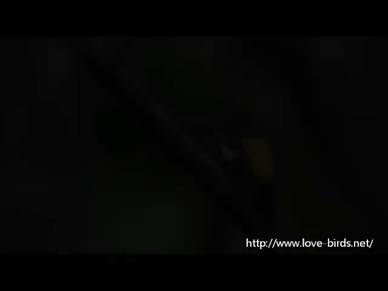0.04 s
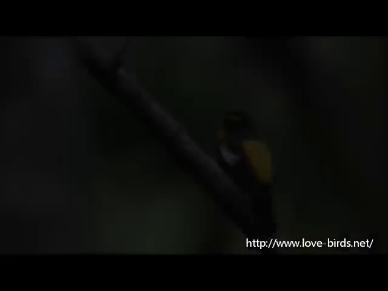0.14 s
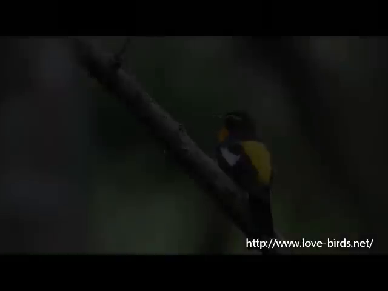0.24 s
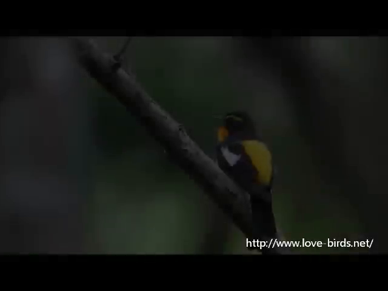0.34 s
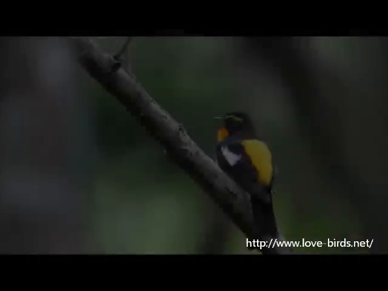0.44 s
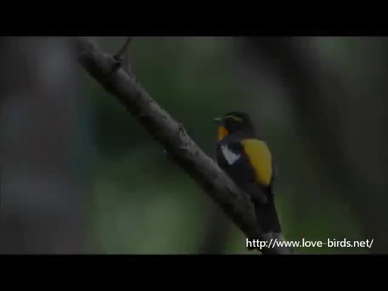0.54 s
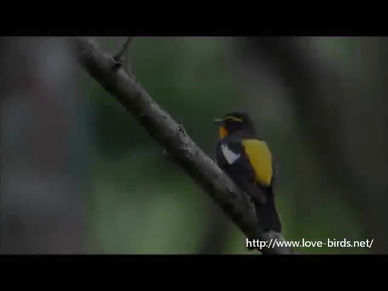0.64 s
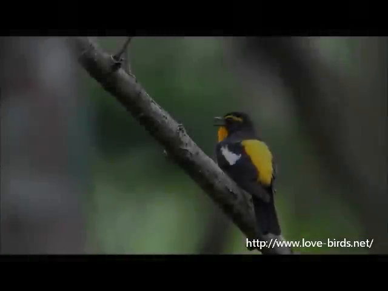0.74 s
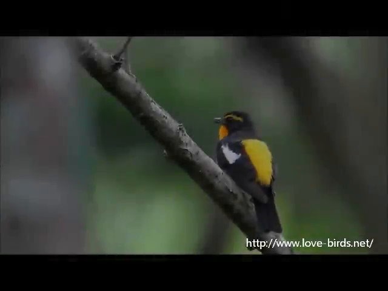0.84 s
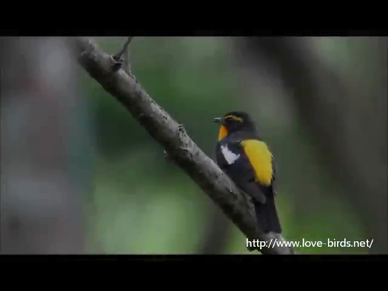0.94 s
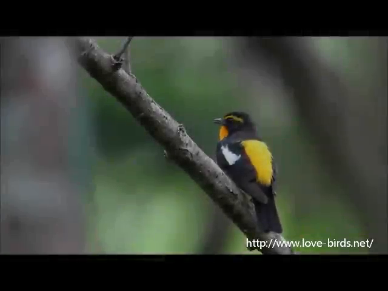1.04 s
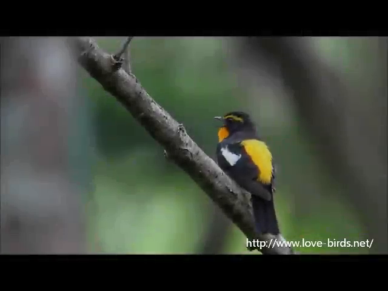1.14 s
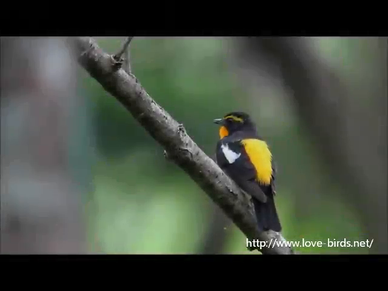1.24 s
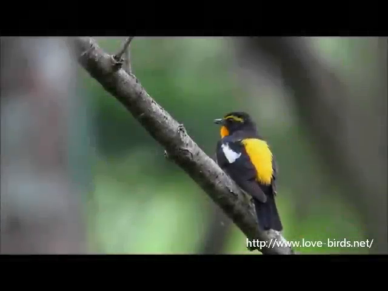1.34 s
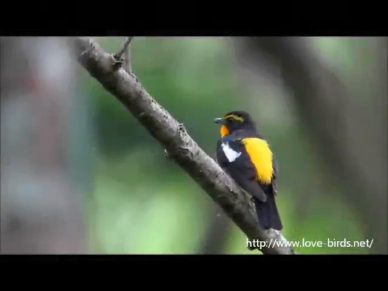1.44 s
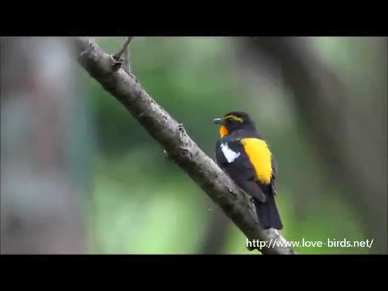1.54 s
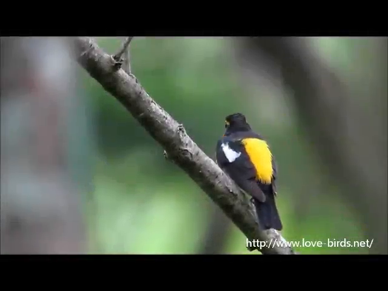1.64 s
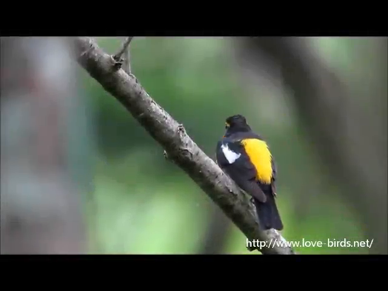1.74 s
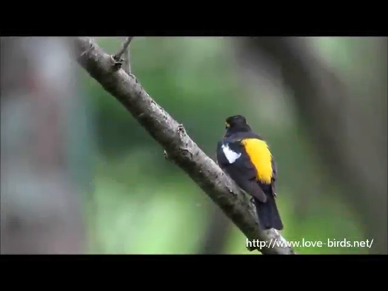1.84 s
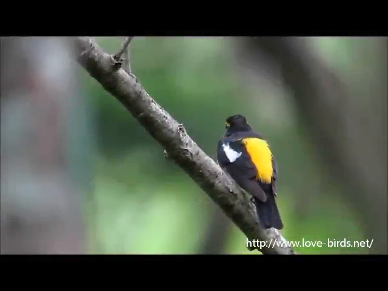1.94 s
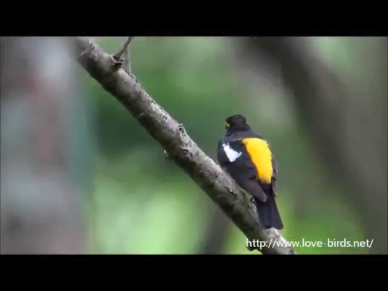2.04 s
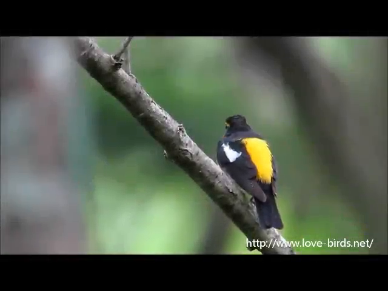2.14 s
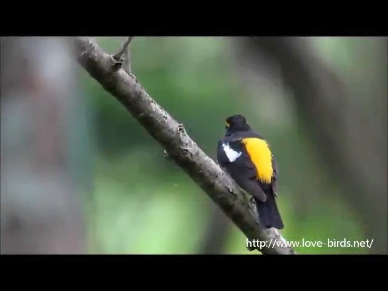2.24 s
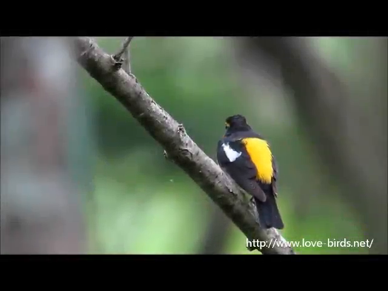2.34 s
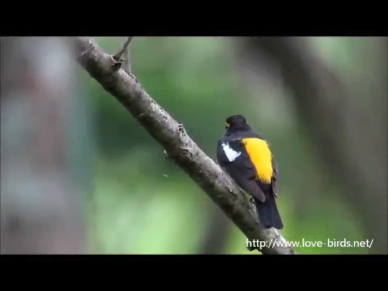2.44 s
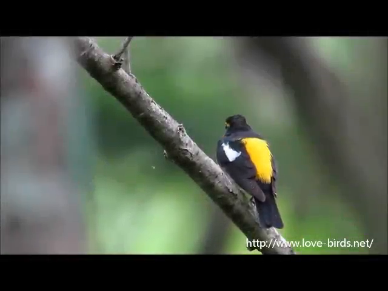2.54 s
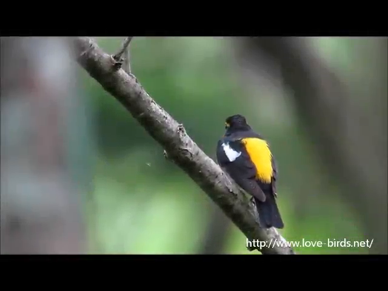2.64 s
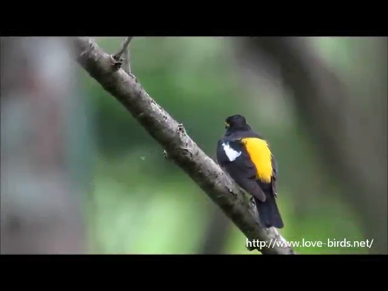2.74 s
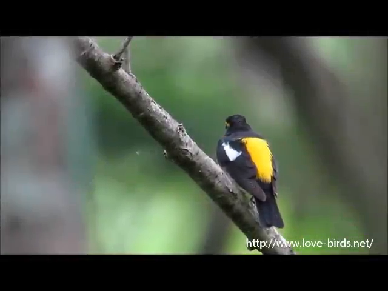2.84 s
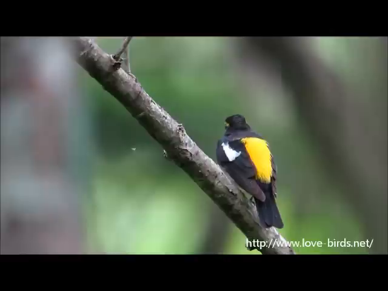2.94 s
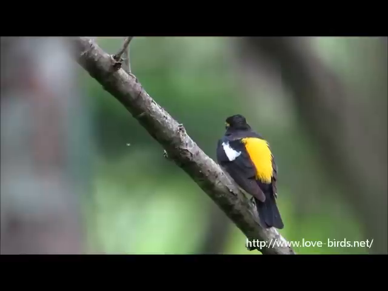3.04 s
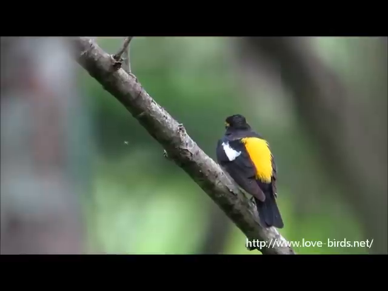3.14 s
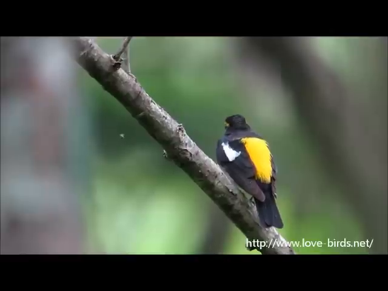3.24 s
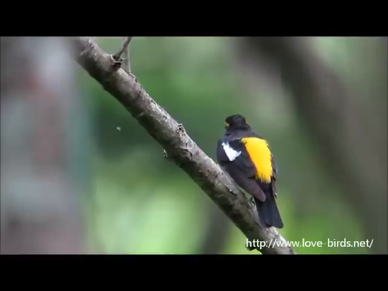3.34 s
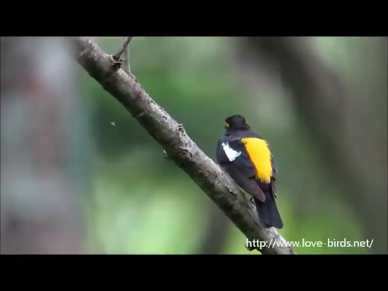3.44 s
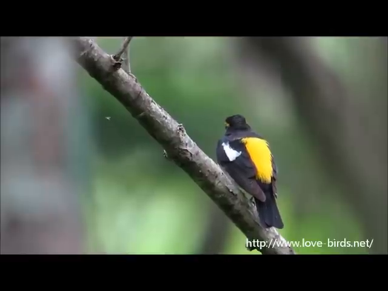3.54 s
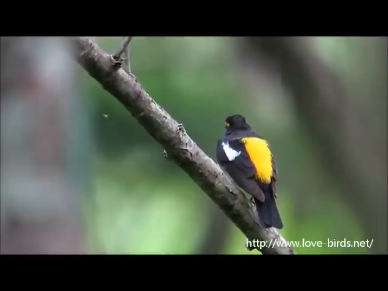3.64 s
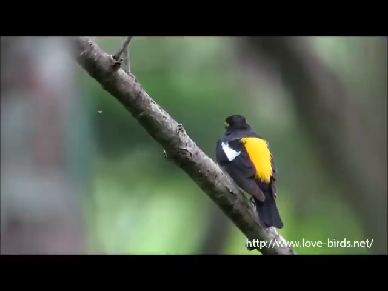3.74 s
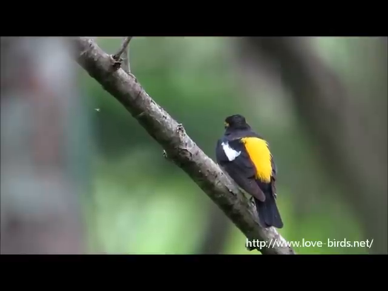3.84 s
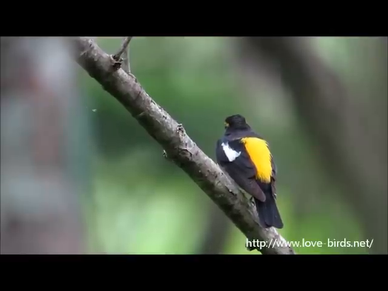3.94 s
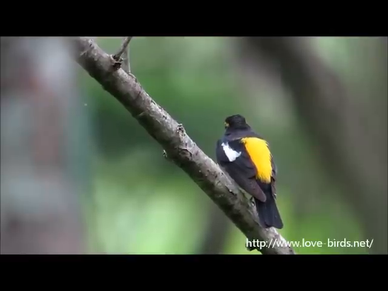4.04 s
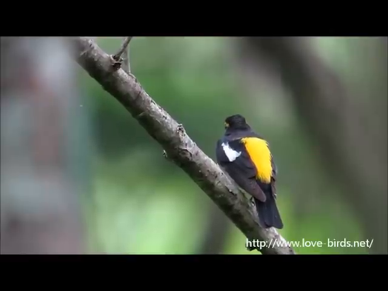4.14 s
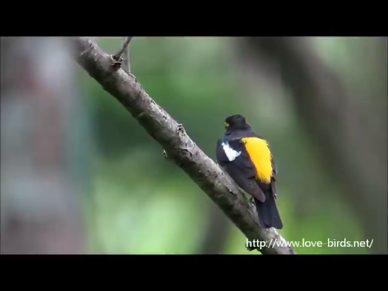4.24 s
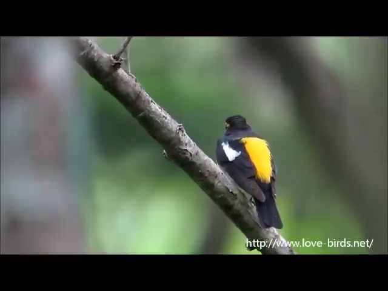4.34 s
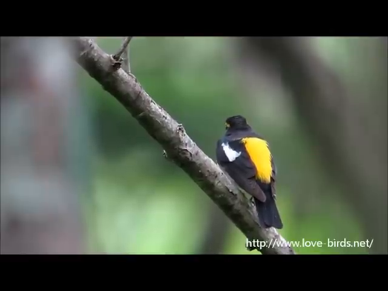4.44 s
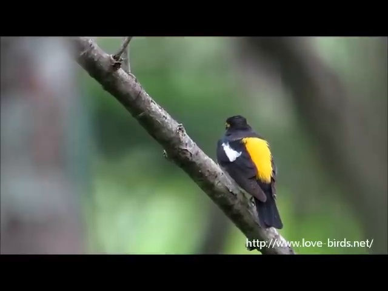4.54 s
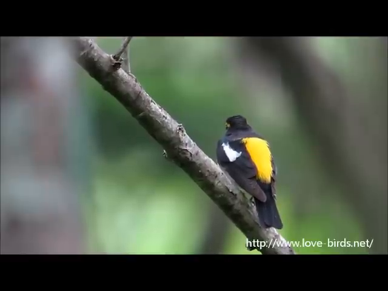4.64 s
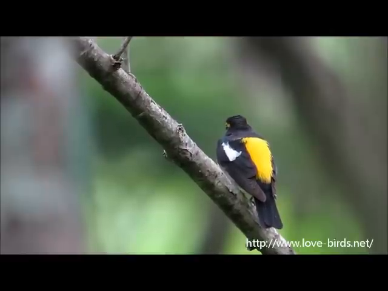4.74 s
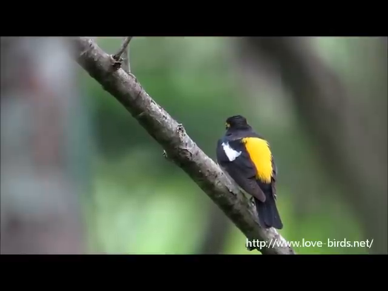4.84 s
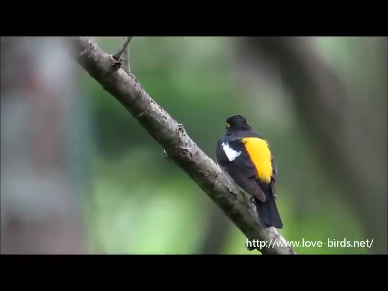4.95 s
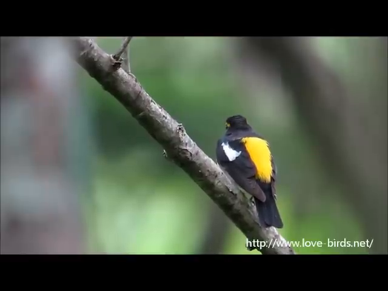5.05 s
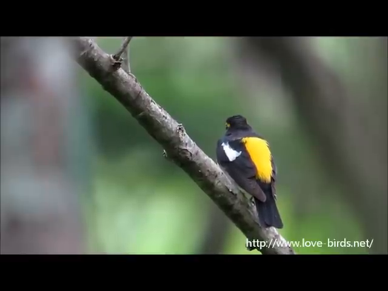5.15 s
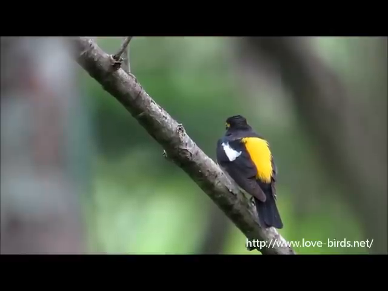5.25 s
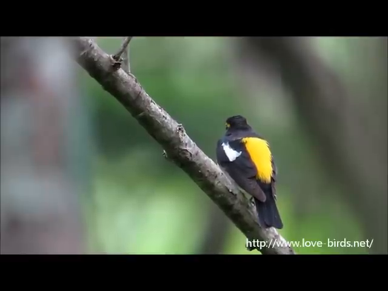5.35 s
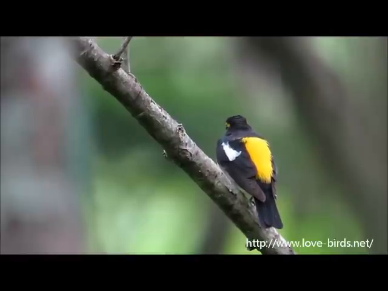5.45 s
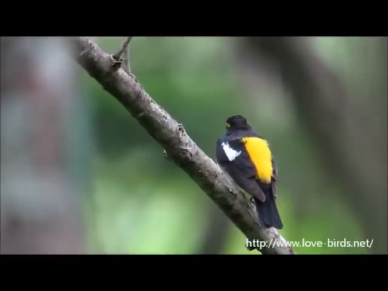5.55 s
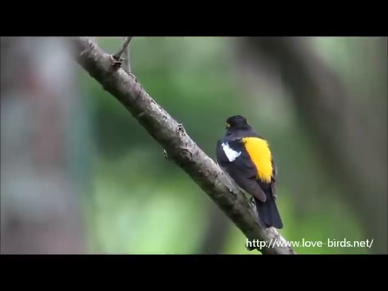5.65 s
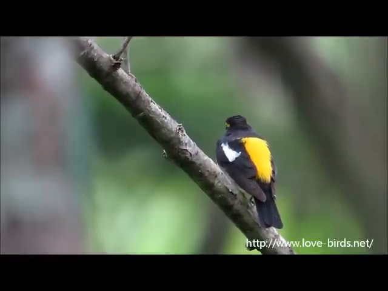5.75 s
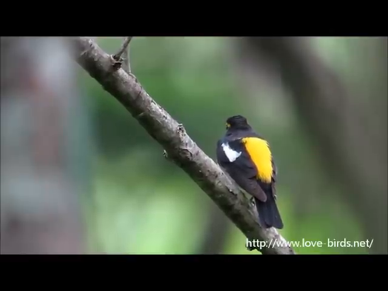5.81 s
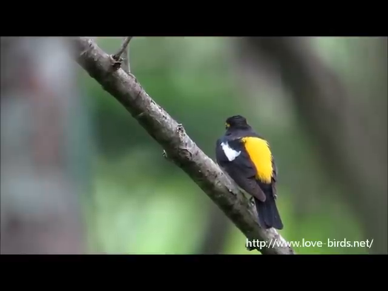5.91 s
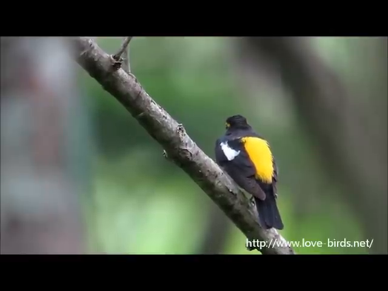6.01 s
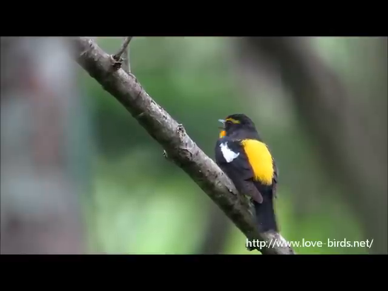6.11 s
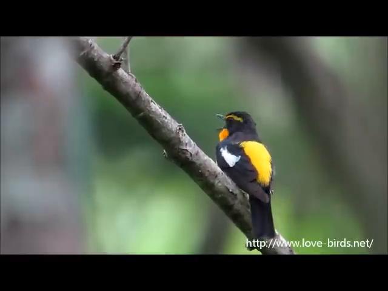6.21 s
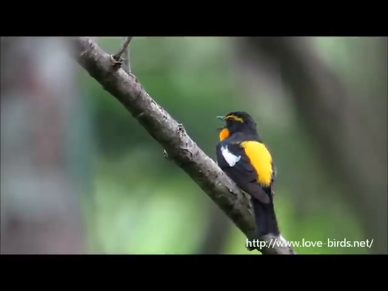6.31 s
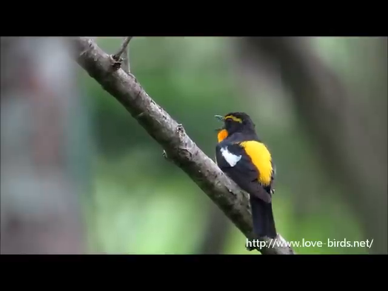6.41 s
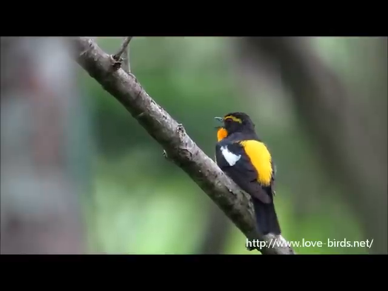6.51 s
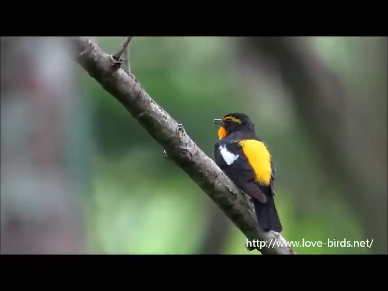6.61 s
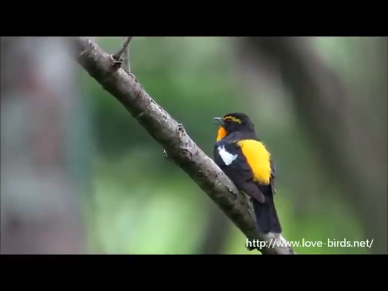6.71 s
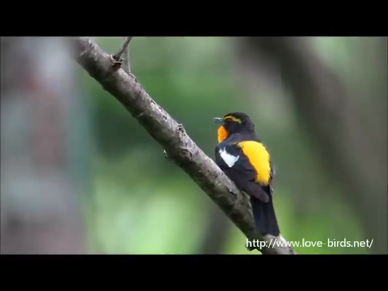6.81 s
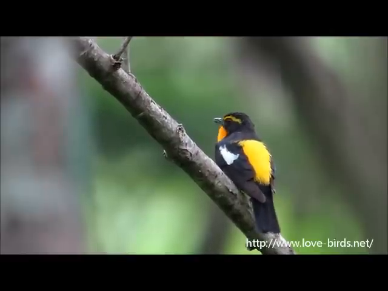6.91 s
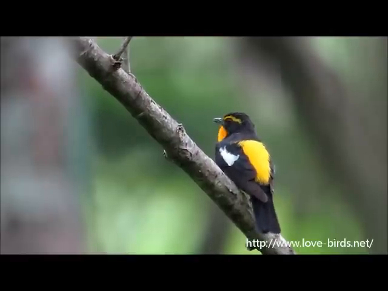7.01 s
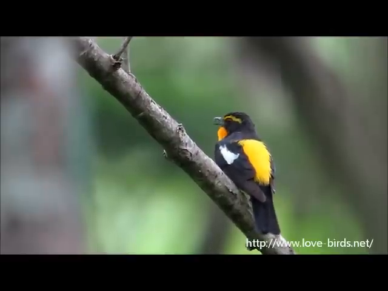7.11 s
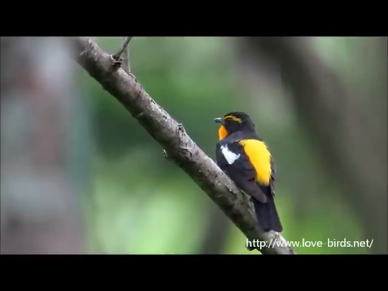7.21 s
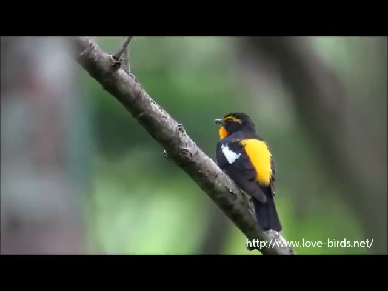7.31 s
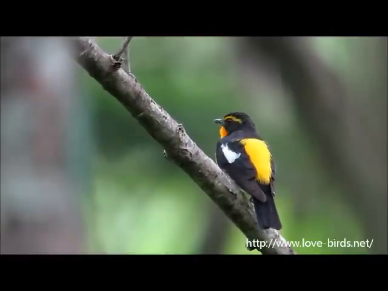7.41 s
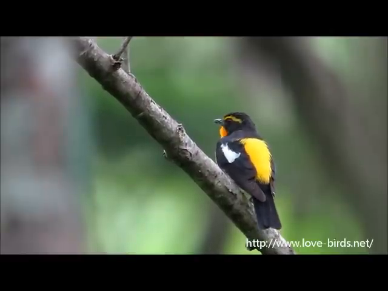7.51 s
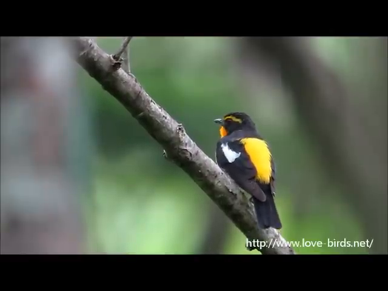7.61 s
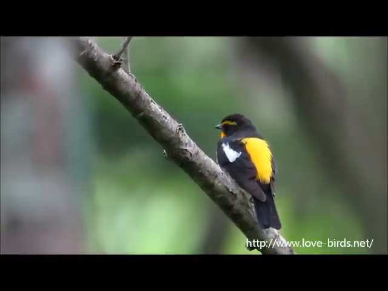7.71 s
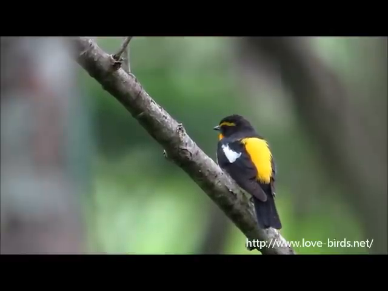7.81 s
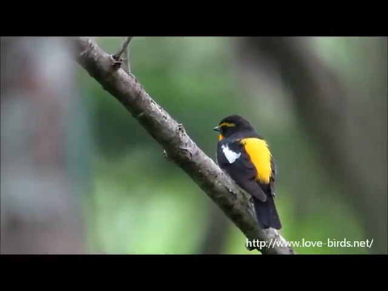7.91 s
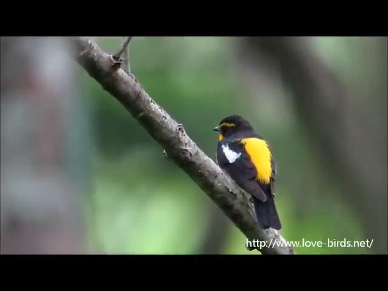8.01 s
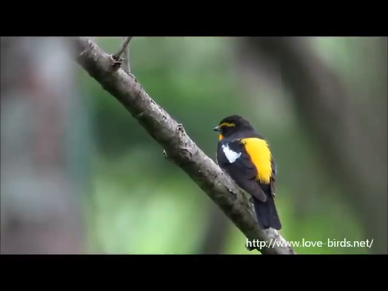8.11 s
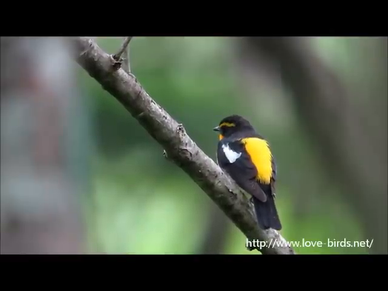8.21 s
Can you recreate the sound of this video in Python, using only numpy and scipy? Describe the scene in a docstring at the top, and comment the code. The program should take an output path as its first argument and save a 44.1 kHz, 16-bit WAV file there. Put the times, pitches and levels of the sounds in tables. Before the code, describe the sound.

Quiet forest air fades in as a nearby songbird, a little to the left, sings a fast warbled buzz and three arched whistles: high, low, high. Birds further off fill the pause with softer slurs, trills and thin calls. The near bird then repeats its phrase, louder. Every note echoes among the trees, over a faint distant rumble and hiss with a few tiny ticks and knocks.

```python
"""A flycatcher in the woods

A flycatcher on a branch sings two phrases: a fast warbled buzz, then three arched whistles, high,
low, high. Birds further off fill the pause with softer slurs and trills, and the trunks scatter
every note into a long tail. Under them lie a distant rumble, hiss, a low drone, a narrow band of
high hiss and a few small ticks and knocks. The sound fades in."""
import sys
import numpy as np
from scipy import signal
from scipy.fft import rfft, irfft
from scipy.io import wavfile
from scipy.ndimage import uniform_filter1d, map_coordinates

SR = 44100
rng = np.random.default_rng(int(sys.argv[2]) if len(sys.argv) > 2 else 0)


def output_pcm(signal):
    """Save a mono or channel-first signal as 16-bit PCM at the path in sys.argv[1].

    Samples are clipped to [-1, 1] before scaling.
    """
    pcm = np.clip(np.atleast_2d(signal).T, -1, 1) * 32767
    wavfile.write(sys.argv[1], SR, np.round(pcm).astype(np.int16))


N = 364707
TIME = np.arange(N) / SR
BINS = np.fft.rfftfreq(N, 1 / SR)


def gain_of(db):
    """Turns decibels into a number to multiply by."""
    return 10 ** (np.asarray(db) / 20)


def evened(x):
    """Scales a signal so its average power is 1."""
    return x / np.sqrt(np.mean(abs(x) ** 2) + 1e-20)


def read(points, hz):
    """Reads between the rows of a table, with frequencies spaced by octaves."""
    f, value = np.transpose(points)
    return np.interp(np.log(hz + 1), np.log(f + 1), value)


def coloured(x, db):
    """Turns each frequency up or down by its own number of dB."""
    return irfft(rfft(x) * gain_of(db), N)


def drift(size, rate):
    """A smooth random wobble that moves about `rate` times a second."""
    knots = rng.standard_normal(int(size * rate / SR) + 4)
    return map_coordinates(knots, [1 + np.arange(size) * rate / SR], order=3, mode="nearest")


def add(mix, s, sound):
    """Mixes a sound in, starting at s seconds."""
    part = mix[round(s * SR):][:len(sound)]
    part += sound[:len(part)]


# The steady air of the wood. Each row: frequency in Hz, relative level in dB.
AIR_COLOUR = [(20, -2), (60, 2), (150, -1.5), (240, -2.5), (400, -5), (700, -8.5), (1200, -12.5),
              (2500, -12), (4500, -11), (6500, -25.5), (9500, -27), (12500, -26.5), (15700, -32.5)]
# How alike left and right sound. Each row: frequency in Hz, likeness from 0 to 1.
AIR_LIKENESS = [(30, 0.37), (250, 0.3), (600, 0.36), (1200, 0.026), (16000, 0.071)]
def air(level_db=-49.5, patchy_db=1.5, swell_db=0.59):
    """Distant rumble and hiss, drifting in patches."""
    frames, hz = N // 256 + 5, np.fft.rfftfreq(1024, 1 / SR)
    a, b, c, d, patches = rng.standard_normal((5, frames, 513))
    patches = uniform_filter1d(patches, size=24, axis=0)  # smooth over time
    patches = evened(uniform_filter1d(patches, size=5, axis=1))  # and over frequency
    likeness = read(AIR_LIKENESS, hz)
    left = a + 1j * b
    right = likeness * left + np.sqrt(1 - likeness ** 2) * (c + 1j * d)
    colour_db = read(AIR_COLOUR, hz) + patchy_db * patches / (1 + hz / 5000)  # high hiss is smoothest
    spectra = np.array([left, right]) * gain_of(colour_db)
    _, wash = signal.istft(spectra.swapaxes(1, 2), nperseg=1024, noverlap=768)
    return evened(wash[:, :N]) * gain_of(level_db + swell_db * drift(N, 5))


# The path of the far drone. Each row: time in seconds, pitch in Hz, level in dB.
DRONE = [(.5, 299.6, -67), (2.599, 289.3, -59.5), (3.801, 272.2, -59.5), (5, 238.3, -62.5), (6, 217.3, -59),
         (7.2, 213, -56.5), (8.27, 210.7, -54.5)]
def drone_and_high_hiss(drone_width_hz=30, hiss_hz=8830, hiss_db=-69, hiss_width_hz=90):
    """A far drone that slowly sinks, and a narrow band of high hiss just above the treble notch."""
    def noise_band(hz, db, width_hz):
        tone = np.exp(2j * np.pi * np.cumsum(hz * np.ones(N)) / SR)
        wobble = drift(N, width_hz) + 1j * drift(N, width_hz)
        return gain_of(db) * evened((wobble * tone).real)
    s, hz, db = np.transpose(DRONE)
    drone = np.interp(TIME, s, hz), np.interp(TIME, s, db), drone_width_hz
    return np.array([noise_band(*drone) + noise_band(hiss_hz, hiss_db, hiss_width_hz) for _ in range(2)])


def bird_voice(hz, db, depth_hz=0, warble_hz=94.2, jitter=0.0037, flutter_db=3.0, dwell=1.3):
    """A nearly pure tone; in a warble the pitch rests low and flicks upward, a little unevenly."""
    size = len(hz)
    cycle = np.pi * np.cumsum(warble_hz * (1 + 0.115 * drift(size, 79.5))) / SR
    swing = 2 * (np.sin(cycle) ** 2) ** dwell - 1
    pitch = hz * (1 + jitter * drift(size, 249.8)) + depth_hz * swing
    phase = 2 * np.pi * np.cumsum(pitch) / SR
    tone = np.sin(phase) + gain_of(-48) * np.sin(2 * phase) + gain_of(-46) * np.sin(3 * phase)
    edges = signal.windows.tukey(size, min(1, 0.0022 * SR / size))
    return np.sqrt(2) * tone * edges * gain_of(db + flutter_db * drift(size, 120.0))


def forest(x, early_t60, late_t60, late_db, near_db):
    """Echoes: branches answer at once, near trunks soon after, and the deep wood lingers."""
    size = 2 * SR
    t = np.arange(size) / SR
    echoes = rng.standard_normal((2, size)) * (rng.random((2, size)) < (1500 + 6000 * t) / SR)
    # A t60 is the number of seconds a sound takes to fade by 60 dB.
    tail = echoes * np.hypot(gain_of(-60 * t / early_t60), gain_of(late_db - 60 * t / late_t60))
    tail /= np.linalg.norm(tail, axis=1, keepdims=True)
    for channel in tail:
        trunk_delays = rng.uniform(0.001988, .03, size=4)
        channel[(trunk_delays * SR).astype(int)] += gain_of(near_db) * rng.choice([-1, 1], size=4)
    return signal.fftconvolve(x[None], tail, axes=1)[:, :N]


# The flycatcher's buzzes. Each row: start and length in seconds, centre pitch in Hz,
# level in dB, warble depth in Hz.
BUZZES = [(0.259, 0.035, 3820, -34, 704), (0.355, 0.31, 4043, -27.5, 853), (6.304, .182, 4174, -22.5, 477),
          (6.555, .11, 4220, -23, 427)]
def buzzes(song, sag_hz_per_s=750, fade_db_per_s=36, catch_s=0.0079, accent_db=2):
    """Each starts firmly at the top of its swing, then warbles fast as it sinks and weakens."""
    for s, length, centre_hz, db, depth_hz in BUZZES:
        t = np.arange(0, length, 1 / SR)
        held = np.exp(-t / catch_s)
        hz = centre_hz - sag_hz_per_s * t + depth_hz * held
        level = db + accent_db * held - fade_db_per_s * t
        add(song, s, bird_voice(hz, level, depth_hz * (1 - held)))


# The note before each long buzz. Each row: start and length in seconds, first and last pitch in Hz,
# level in dB.
LEAD_INS = [(0.288, 0.058, 3688, 3675, -24), (6.261, .05, 3485, 3970, -24.5), (6.52, .034, 4587, 4450, -16)]
def lead_ins(song, curve=1.41, swell_db=16):
    """Short clear notes that bend in pitch and are loudest in the middle."""
    for s, length, first_hz, last_hz, db in LEAD_INS:
        u = np.linspace(0, 1, int(length * SR))
        hz = first_hz + (last_hz - first_hz) * u ** curve
        add(song, s, bird_voice(hz, db - swell_db * (1 - np.sin(np.pi * u)), depth_hz=60))


def far_note(length, first_hz, last_hz, db, depth_hz, settle=3.2, onset_db=-10, release_db=-4):
    """A far bird's note swells as it slides towards its last pitch, then eases off."""
    u = np.linspace(0, 1, int(length * SR))
    slide = (1 - np.exp(-settle * u)) / (1 - np.exp(-settle))
    hz = first_hz + (last_hz - first_hz) * slide
    level = db + onset_db * (1 - slide) + release_db * u ** 2
    return bird_voice(hz, level, depth_hz, warble_hz=170, jitter=0.0077)


# Far birds' falling notes. Each row: start and length in seconds, first and last pitch in Hz,
# level in dB, warble depth in Hz.
SLURS = [(0.771, 0.096, 5680, 4310, -49.5, 150), (1.822, 0.12, 3680, 2850, -56.5, 150),
         (2.01, 0.095, 5050, 4520, -54, 150), (2.29, .12, 5600, 4250, -47.5, 150),
         (2.894, 0.045, 4890, 3800, -43, 300), (3.892, 0.16, 4826, 4084, -36, 70),
         (4.455, 0.182, 6160, 4615, -39.5, 30), (5.75, 0.077, 4940, 4290, -56.5, 100),
         (6.169, 0.11, 5000, 4450, -43.5, 200)]
def far_slurs(song, settle_s=.032):
    """Each drops steeply, then levels out."""
    for s, length, *note in SLURS:
        add(song, s, far_note(length, *note, settle=length / settle_s, onset_db=-7.5))


# The flycatcher's whistles. Each row: start and length in seconds, top pitch in Hz, level in dB,
# rise time in seconds.
WHISTLES = [(0.866, .11, 3287, -26.5, .011), (1.074, .097, 2472, -35.5, 0.014),
            (1.242, 0.1, 3424, -24.5, 0.011), (6.871, .11, 3332, -26, 0.012),
            (7.073, .1, 2403, -35.5, .016), (7.237, .102, 3338, -27, .012)]
def arched_whistles(song, first_share=.54, last_share=.64, fall_s=.037, db_per_octave=28):
    """The pitch leaps up from a share of its top, holds and drops away; the level follows it."""
    for s, length, top_hz, db, rise_s in WHISTLES:
        t = np.arange(0, length, 1 / SR)
        rise = 1 - (1 - first_share) * np.exp(-t / rise_s)
        closing = np.clip(1 - (length - t) / fall_s, 0, 1)
        arch = rise * (1 - (1 - last_share) * closing ** 2)
        soft_start_db = -6 * np.exp(-t / 0.012)
        add(song, s, bird_voice(top_hz * arch, db + db_per_octave * np.log2(arch) + soft_start_db))


# How the throat and open bill shape the song. Each row: frequency in Hz, boost or cut in dB.
THROAT = [(1600, -2), (2400, -1.5), (3750, -0.5), (4150, 0.5), (4650, -7.5), (4950, -3.5), (5400, -8),
          (7000, -12), (11000, 0.5)]
# How much louder the song is on the left. Each row: frequency in Hz, left minus right in dB.
LEFT_LEAD = [(1500, 0.5), (2400, 0), (3300, 3.5), (3900, 8.5), (5000, 5), (9000, 1)]
def flycatcher(direct_db=-6, wood_db=-0.5):
    """Buzzes and arched whistles from a branch a little to the left, with their echoes."""
    song = np.zeros(N)
    for sing in lead_ins, buzzes, arched_whistles:
        sing(song)
    echo = forest(song, early_t60=0.61, late_t60=1.44, late_db=-16, near_db=-10)
    heard = gain_of(direct_db) * song + gain_of(wood_db) * echo
    sides_db = np.outer([.5, -.5], read(LEFT_LEAD, BINS))
    return coloured(heard, read(THROAT, BINS) + sides_db)


# The clearest dry ticks close by. Each row: start in seconds, level in dB.
TICKS = [(.8843, -45), (1.2639, -45.5), (1.6431, -47), (2.0556, -46), (2.4353, -46), (2.762, -44.5),
         (4.5335, -46)]
# Their brightness. Each row: frequency in Hz, boost or cut in dB.
TICK_COLOUR = [(300, -14), (2000, 3), (5000, 9), (7000, -1.5), (10000, 5), (13000, -2), (16000, -6)]
def ticks(t60=0.023, right_db=3.0, soft_between_s=(0.23, 3.3), soft_db=-54.5):
    """Very short bright snaps, a little to the right; seven softer ones fall at random."""
    t, strength = np.arange(2000) / SR, np.zeros(N)
    soft = [(s, soft_db) for s in rng.uniform(*soft_between_s, size=7)]
    for s, db in [*TICKS, *soft]:
        add(strength, s, gain_of(db - 60 * t / t60))
    snaps = coloured(strength * rng.standard_normal((2, N)), read(TICK_COLOUR, BINS))
    return snaps * gain_of([[-right_db], [right_db]])


# A far bird's four churrs. Each number: start in seconds.
CHURR_STARTS = [2.0, 2.755, 3.268, 3.85]
def far_churrs(song):
    """A low, falling note, roughened by a fast warble."""
    for s in CHURR_STARTS:
        add(song, s, far_note(length=.15, first_hz=2500, last_hz=2132, db=-52, depth_hz=259))


# A tiny bird's calls. Each row: start in seconds, first pitch in Hz, level in dB.
THIN_CALLS = [(2.41, 7950, -54), (2.6, 7840, -57), (2.74, 7900, -60), (3.917, 7340, -51), (4.05, 7270, -53),
              (4.68, 8100, -55), (5.556, 8200, -56), (5.915, 8000, -59), (6.07, 7650, -54.5),
              (6.68, 7130, -52.5), (7.014, 6420, -51.5), (7.16, 6460, -53), (7.482, 7130, -53)]
def far_thin_calls(song, length=0.1, last_share=.925):
    """Very high notes that sink a little and trail off."""
    for s, hz, db in THIN_CALLS:
        call = far_note(length, hz, hz * last_share, db, depth_hz=120,
                        settle=1.31, onset_db=-4.5, release_db=-10)
        add(song, s, call)


# Soft woody knocks. Each row: start in seconds, level in dB.
KNOCKS = [(2.487, -43), (2.511, -49.5), (2.663, -48.5)]
# The tones a knock rings with. Each row: pitch in Hz, level in dB, seconds to fade by 60 dB.
KNOCK_TONES = [(570, 3, .02), (780, 5.5, 0.033), (950, -8, .012), (1310, 9, 0.017), (2680, 12, 0.0071)]
def knocks(contact_s=0.0031):
    """Brief scraping contacts ring a few tones that die quickly."""
    t, out = np.arange(3000) / SR, np.zeros((2, N))
    ring = sum(gain_of(db - 60 * t / t60) * np.sin(2 * np.pi * hz * t) for hz, db, t60 in KNOCK_TONES)
    for s, db in KNOCKS:
        for channel in out:
            contact = rng.standard_normal(len(t)) * np.exp(-t / contact_s)
            add(channel, s, gain_of(db) * signal.fftconvolve(contact / np.linalg.norm(contact), ring))
    return out


# Far birds' trills. Each row: start and length in seconds, centre pitch in Hz, level in dB.
TRILLS = [(2.578, 0.23, 3400, -54), (3.09, 0.22, 3340, -53), (3.463, 0.066, 4596, -45),
          (3.688, 0.065, 4700, -40.5), (4.273, .04, 4600, -47), (4.696, 0.16, 4435, -40.5),
          (5.295, 0.099, 3708, -41), (5.324, 0.13, 4680, -51), (6.717, 0.23, 5440, -55)]
def far_trills(song, swing_share=0.1086):
    """The pitch swings fast and wide around one note."""
    for s, length, hz, db in TRILLS:
        add(song, s, far_note(length, hz, hz, db, hz * swing_share, onset_db=-2, release_db=-7))


# Far birds' steady whistles. Each row: start and length in seconds, pitch in Hz, level in dB.
FAR_WHISTLES = [(3.41, 0.037, 6180, -50), (3.469, 0.075, 5030, -46), (3.73, 0.14, 5220, -45),
                (4.073, 0.068, 3927, -41.5), (4.115, .08, 3013, -44), (4.413, 0.037, 6150, -48),
                (4.524, .065, 3604, -33.5), (4.765, 0.055, 3876, -34), (4.889, 0.056, 3400, -42),
                (4.896, .08, 2800, -50), (5.132, 0.084, 3566, -39), (5.154, 0.064, 5470, -44),
                (5.399, 0.1, 3770, -42.5), (7.787, 0.096, 4970, -49.5), (7.83, 0.083, 4236, -47),
                (7.993, .14, 5000, -56), (8.04, 0.14, 4230, -55.5)]
def far_whistles(song, first_share=0.93):
    """Each slides up from just below its pitch, then holds it with a slight quiver."""
    for s, length, hz, db in FAR_WHISTLES:
        whistle = far_note(length, hz * first_share, hz, db, depth_hz=44.3,
                           settle=8.1, onset_db=-6.5, release_db=-5)
        add(song, s, whistle)


def far_birds(direct_db=-15, wood_db=-1, left_db=0.66):
    """Birds deeper in the wood; most of their song arrives as echo."""
    song = np.zeros(N)
    for sing in far_slurs, far_whistles, far_trills, far_thin_calls, far_churrs:
        sing(song)
    echo = forest(song, early_t60=1.0, late_t60=0.97, late_db=-11, near_db=-11)
    heard = gain_of(direct_db) * song + gain_of(wood_db) * echo
    return heard * gain_of([[left_db], [-left_db]])


# Soft chirps. Each row: start and length in seconds, first and last pitch in Hz, level in dB.
CHIRPS = [(3.974, 0.0236, 2710, 3440, -51), (4.284, 0.033, 3750, 3170, -51),
          (5.589, 0.054, 3600, 2400, -60.5)]
def near_chirps(bend=1.3, wood_db=-6):
    """Quick slides of pitch from close by, with some echo."""
    song = np.zeros(N)
    for s, length, first_hz, last_hz, db in CHIRPS:
        u = np.linspace(0, 1, int(length * SR))
        hz = last_hz + (first_hz - last_hz) * (1 - u) ** bend
        add(song, s, bird_voice(hz, db) * signal.windows.tukey(len(u)))
    return song + gain_of(wood_db) * forest(song, early_t60=0.75, late_t60=1.4, late_db=-16, near_db=2)


def scene():
    """All the sounds of the wood together, left and right."""
    return flycatcher() + far_birds() + near_chirps() + ticks() + knocks() + air() + drone_and_high_hiss()


# A narrow gap in the treble. Each row: frequency in Hz, boost or cut in dB.
TREBLE_NOTCH = [(7300, 0.5), (7800, -8), (8050, -26.5), (8250, -45.5), (8450, -13.5), (8750, -6.5),
                (9100, 0)]
def record(dry, fade_start_s=0.07, fade_end_s=2.65, top_hz=15750):
    """Fades the sound in, cuts a narrow gap in the treble and removes the very highest sounds."""
    faded = dry * np.clip((TIME - fade_start_s) / (fade_end_s - fade_start_s), 0, 1)
    notched = coloured(faded, read(TREBLE_NOTCH, BINS))
    low_pass = signal.firwin(767, top_hz, window=("kaiser", 9), fs=SR)
    return signal.oaconvolve(notched, low_pass[None], "same")


dry = scene()
out = record(dry)
output_pcm(out)
```